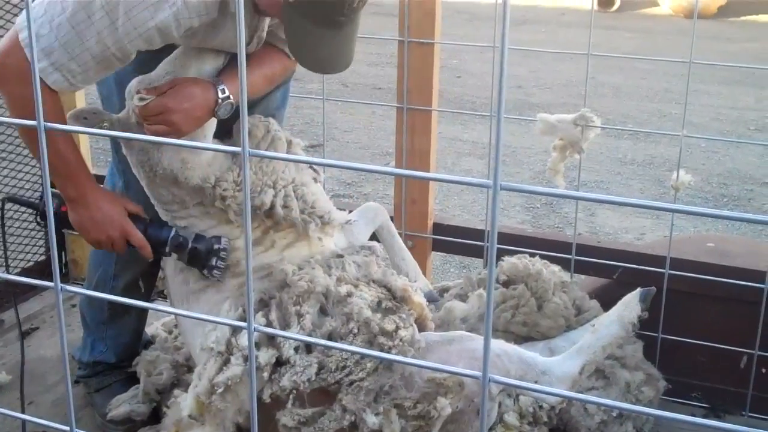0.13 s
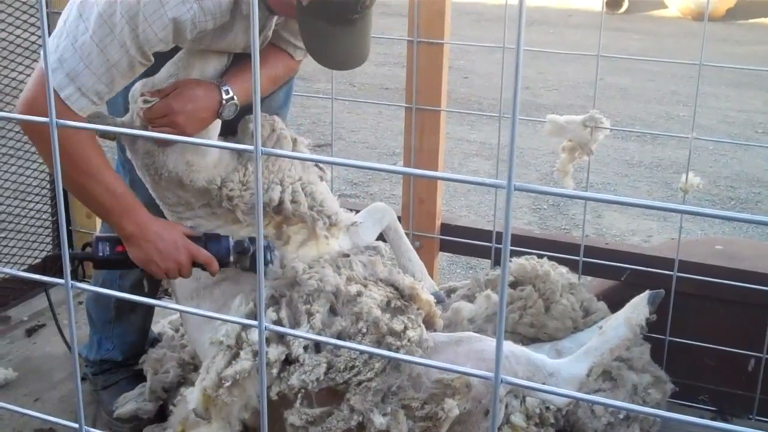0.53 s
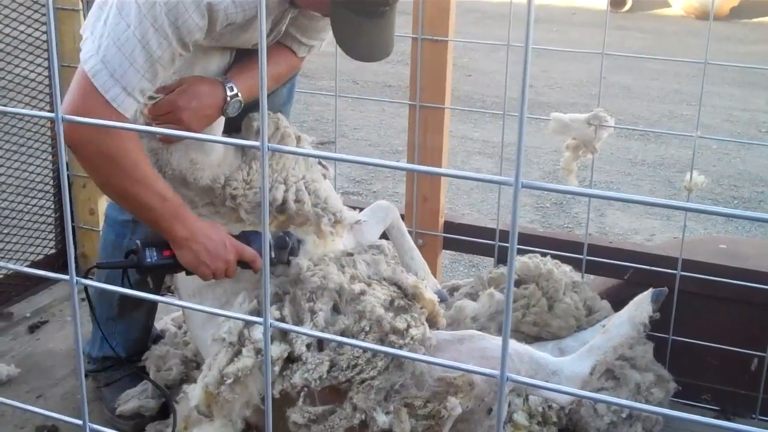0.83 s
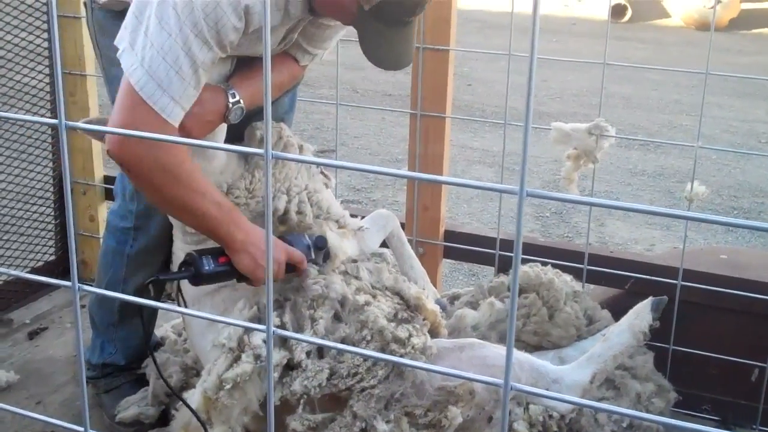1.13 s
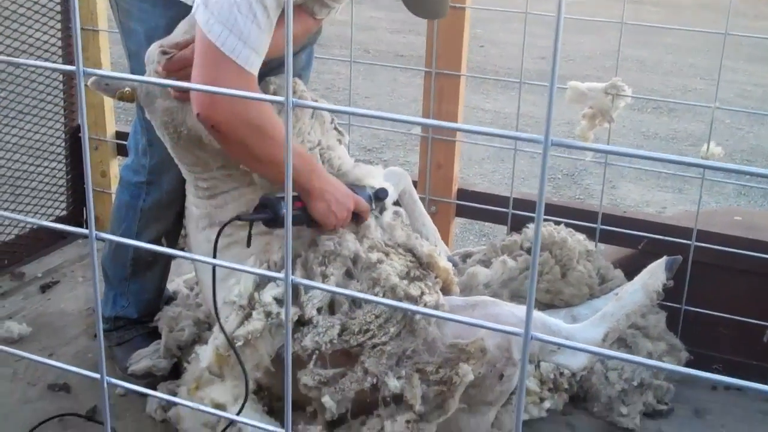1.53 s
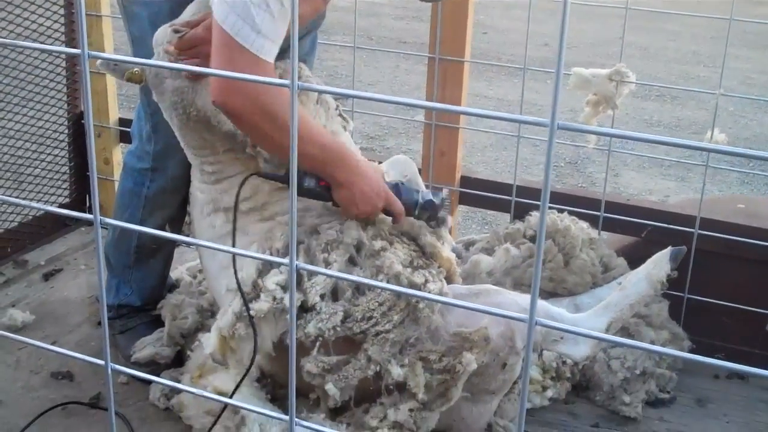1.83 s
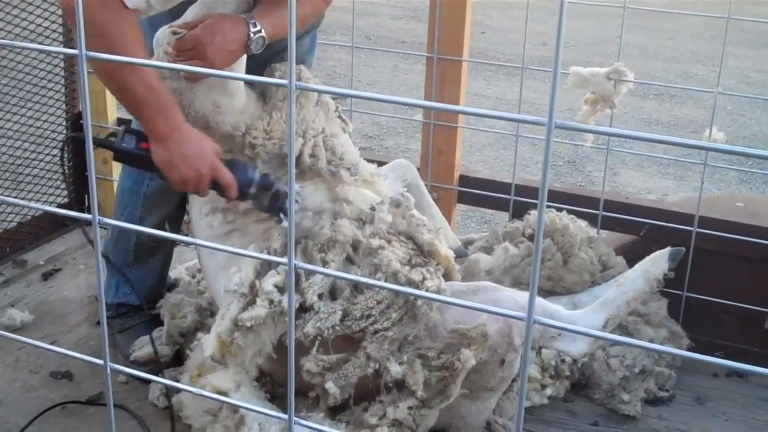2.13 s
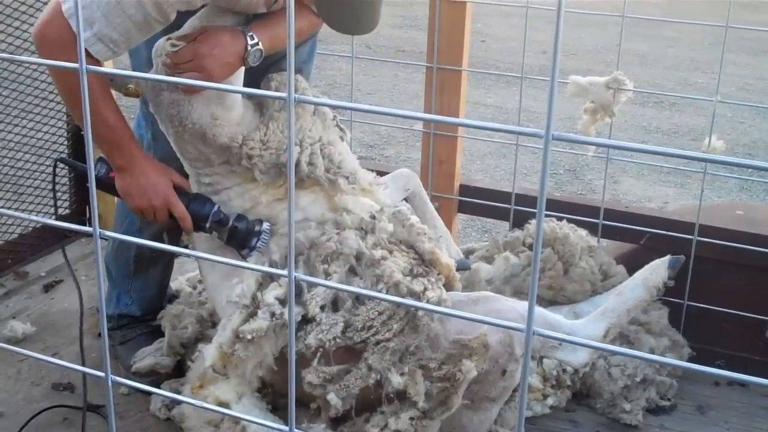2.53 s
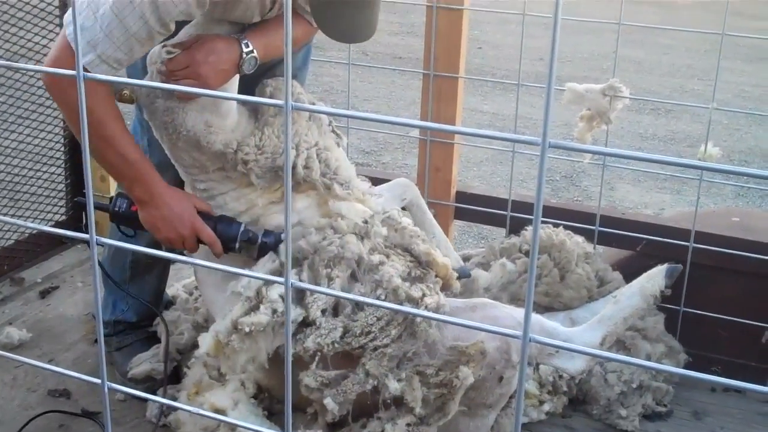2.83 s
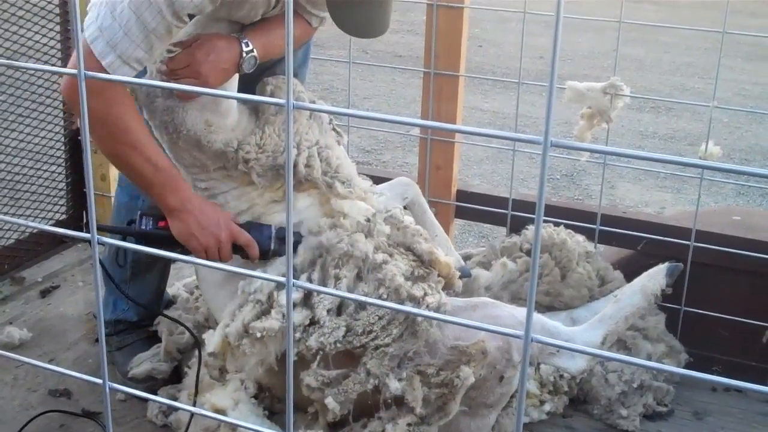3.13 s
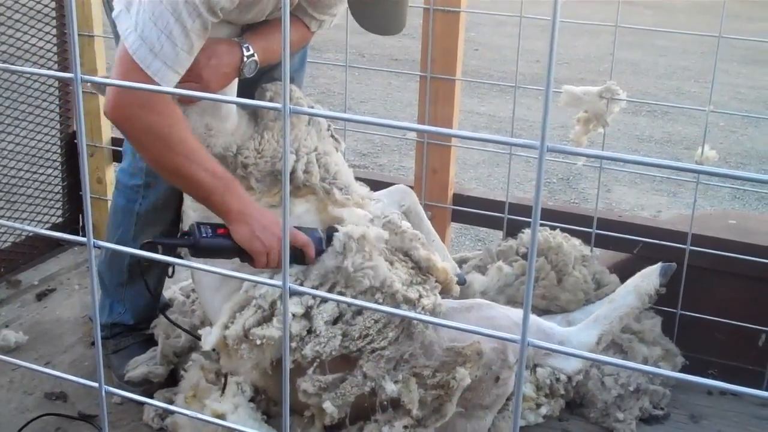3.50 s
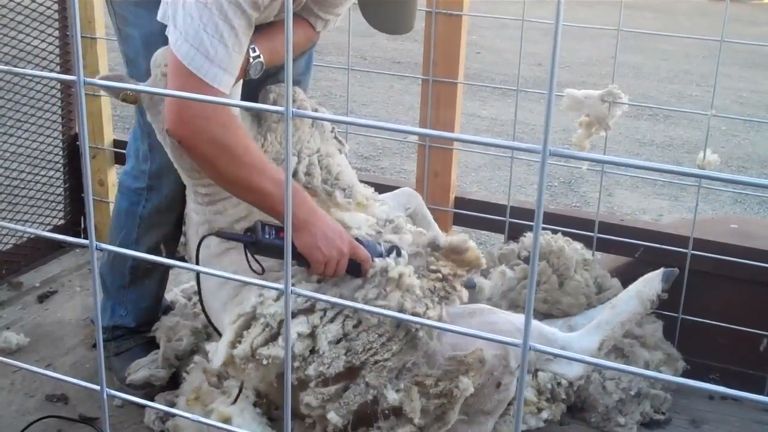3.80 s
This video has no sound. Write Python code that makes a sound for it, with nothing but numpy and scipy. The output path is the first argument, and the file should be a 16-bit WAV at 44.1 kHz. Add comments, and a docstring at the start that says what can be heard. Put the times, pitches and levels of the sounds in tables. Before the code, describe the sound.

A fast, rattling clipper motor whines and scrapes continuously while shearing a sheep, its tone shifting as the tool turns. Close stereo microphone outdoors, slightly left, with occasional blade snaps and light low wind.

```python
"""Electric sheep shears in an outdoor pen

Electric shears work on a sheep a few steps away. A fast motor drives a 7-tooth pinion and a crank: sines at the
turning rate and at the tooth rate. The cutter, shaped noise, knocks at each reversal and scrapes across the comb.
The motor slows in the wool and the hand turns the tool so that its colour shifts; the blades snap now and then.
Light wind, low noise, rumbles in two microphone ports, mostly the left."""
import sys
import numpy as np
from scipy import signal
from scipy.fft import rfft, irfft, next_fast_len
from scipy.io import wavfile
from scipy.ndimage import uniform_filter1d, map_coordinates

SR = 44100
rng = np.random.default_rng(int(sys.argv[2]) if len(sys.argv) > 2 else 0)


def linear_from_db(decibels):
    """Turn decibels (scalar or array-like) into linear amplitude factors; 0 gives 1."""
    return 10 ** (np.asarray(decibels, float) / 20)


def generate_wav(signal):
    """Clip the signal to [-1, 1] and save it as 16-bit WAV at the path in sys.argv[1]."""
    frames = np.transpose(np.atleast_2d(signal))
    scaled = np.clip(frames, -1, 1) * 32767
    pcm = np.round(scaled).astype(np.int16)
    wavfile.write(sys.argv[1], SR, pcm)


N = 174636  # samples

# Radiation as the tool turns. Each row: time in seconds, level of the gear mesh tone in dB, level of its octave
# in dB, then scrape level in dB around each band of facing(), where only its change about the mean counts.
FACING_LEVELS = [(0.0, -25, -32, -47, -35, -27.5, -21.5, -23),
                 (0.3, -19, -53, -50.5, -26.5, -22.5, -22.5, -19.5),
                 (0.52, -28, -25, -47.5, -32.5, -25, -22, -22),
                 (0.75, -31, -44, -46.5, -34.5, -23.5, -23.5, -20),
                 (1.0, -23.5, -26, -44, -34, -22.5, -19.5, -23.5),
                 (1.27, -24, -28, -44, -34.5, -24, -19, -22.5),
                 (1.5, -30.5, -39, -42.5, -31, -22.5, -21.5, -20.5),
                 (1.8, -30.5, -29, -40, -35, -18.5, -21, -20.5),
                 (2.08, -19, -32.5, -47.5, -29.5, -24, -18.5, -21.5),
                 (2.3, -22, -29, -52, -29.5, -20.5, -23.5, -22.5),
                 (2.5, -27.5, -56, -48.5, -37.5, -29, -25, -24),
                 (2.75, -26.5, -30, -49.5, -33, -24, -21.5, -19.5),
                 (3.0, -20, -42, -45, -31, -20.5, -24.5, -20),
                 (3.2, -22.5, -21, -44.5, -31.5, -21.5, -20.5, -20.5),
                 (3.5, -21, -32, -44, -35, -23, -18, -22), (3.75, -29.5, -29, -46.5, -36, -27, -18.5, -27),
                 (3.96, -20, -31, -56, -36.5, -27.5, -19.5, -23.5)]


def unit(x):
    """Normalisation: divides by the root mean square, so that the rms is 1."""
    return x / np.sqrt(np.mean(x ** 2) + 1e-20)


def along(points, hz):
    """Logarithmic pitch scale: interpolates (Hz, value) points on a log frequency axis."""
    f, v = np.transpose(points)
    return np.interp(np.log(hz + 1), np.log(f + 1), v)


def curves(rows, t=None):
    """Piecewise-linear motion: one value per moment for each column after the time."""
    s, *columns = np.transpose(rows)
    moments = np.arange(N) / SR if t is None else t
    return np.array([np.interp(moments, s, column) for column in columns])


def wobble(rate):
    """Band-limited randomness: a smooth spline through random knots, rate of them a second."""
    knots = rng.standard_normal(N // 8)
    return map_coordinates(knots, [np.arange(N) * rate / SR])


def filtered(x, response):
    """Linear filtering: multiplies the spectrum by a response of frequency."""
    m = next_fast_len(N + SR // 2)
    spectrum = rfft(x, m) * response(np.fft.rfftfreq(m, 1 / SR))
    return irfft(spectrum, m)[..., :N]


def spread(pair):
    """Interchannel coherence: mid and side weights cos and sin of a give left and right a correlation cos 2a."""
    # Each row: frequency in Hz, left-right correlation (0-1).
    likeness = [(600, .99), (2900, 0.93), (6200, 0.76), (9500, 1)]

    def angle(hz):
        return np.arccos(np.clip(along(likeness, hz), -1, 1)) / 2

    mid, side = filtered(pair, lambda hz: np.array([np.cos(angle(hz)), np.sin(angle(hz))]))
    return np.array([mid + side, mid - side])


def turns():
    """Rotational kinematics: motor turns so far are the running integral of its speed."""
    # Motor speed under load. Each row: time in seconds, speed in turns a second.
    motor_speed = [(0.0, 358.2), (0.2, 357.9), (0.45, 355.4), (0.65, 353.9), (0.85, 350.5), (1.1, 349.7),
                   (1.35, 350.4), (1.55, 350.3), (1.75, 354.2), (1.95, 358.3), (2.15, 359.6), (2.45, 360.4),
                   (2.7, 359.2), (2.95, 355.3), (3.2, 351.7), (3.45, 348.4), (3.7, 348.7), (3.96, 354.1)]
    return np.cumsum(curves(motor_speed)[0]) / SR


def stroke():
    """Crank motion locked to the motor: strokes so far, and the repeating swell of each stroke in dB."""
    # One stroke of the cutter. Each row: share of the stroke (0-1), swell in dB.
    swell_shape = [(0, -9), (.05, 2), (.2, 2), (.35, 1), (.56, 1.5), (.85, -9), (1, -9)]
    strokes_per_turn, first_reversal = .193, .95  # the latter in strokes from the start
    strokes = turns() * strokes_per_turn - first_reversal + 2  # + 2 keeps the count positive
    return strokes, np.interp(strokes % 1, *np.transpose(swell_shape))


def cutter():
    """Friction and impact: noise swells with each stroke over a steady whirr; decaying knocks mark reversals."""
    # Each row: frequency in Hz, share (0-1) of the power that runs steadily as whirr.
    whirr_share = [(1000, .88), (2200, .6), (3200, .33), (4800, .1), (10000, .7)]
    # Each row: frequency in Hz, knock level in dB over the scrape.
    knock_colour = [(250, -7.5), (1500, -6.5), (3000, -9), (10000, -8)]
    # Spectrum of the whole cutter. Each row: frequency in Hz, relative level in dB per Hz.
    scrape_colour = [(150, -42), (560, -32), (696, -16.5), (1040, -24), (1570, -10.5), (1860, -14.5),
                     (2130, -2), (2550, -7), (3050, 0), (4000, -6.5), (5090, -6.5), (6390, -16),
                     (10300, -28.5), (12500, -34.5), (14500, -50)]
    stroke_scatter_db, grit_db = 1, 1.5
    knock_t60_s, knock_scatter_db = .009, 1

    strokes, shape_db = stroke()
    nth = strokes.astype(int)
    luck = rng.standard_normal((nth[-1] + 1, 2))  # for each stroke: swell, knock
    swell_db = shape_db + stroke_scatter_db * luck[nth, 0]
    grit = grit_db * np.tanh(wobble(1200))
    scrape = unit(linear_from_db(swell_db + grit) * rng.standard_normal((2, N)))

    def share(hz):
        return np.clip(along(whirr_share, hz), 0, 1)

    rub = filtered(scrape, lambda hz: np.sqrt(1 - share(hz)))
    whirr = filtered(rng.standard_normal((2, N)), lambda hz: np.sqrt(share(hz)))

    reversals = np.diff(nth, prepend=nth[0])
    blows = reversals * linear_from_db(knock_scatter_db * luck[nth, 1])
    t = np.arange(2048) / SR
    knocks = 0
    for way in range(2):  # each direction keeps one ring of its own
        ring = rng.standard_normal((2, len(t))) * linear_from_db(-60 * t / knock_t60_s)
        this_way = blows * (nth % 2 == way)
        knocks = knocks + signal.fftconvolve(this_way[None], ring, axes=1)[:, :N]
    knocks = filtered(unit(knocks), lambda hz: linear_from_db(along(knock_colour, hz)))
    return spread(filtered(rub + whirr + knocks, lambda hz: linear_from_db(along(scrape_colour, hz))))


def facing(x):
    """Directivity: as the tool twists, band levels change, ridges glide and narrow patches drift."""
    # Middles of the scrape bands, in Hz.
    band_hz = [750, 1500, 2150, 3100, 5200]
    # Bright ridges that glide through the scrape as the tool swings. Each row: middle in seconds, length in
    # seconds, centre at its start in Hz, centre at its end in Hz, height in dB.
    ridges = [(0.447, .3, 2950, 2940, 7), (.64, 0.22, 4150, 4500, 5.5), (1.433, 0.16, 3820, 3900, 5.5),
              (1.66, .2, 4000, 4200, 7), (2.084, 0.2, 3440, 3830, 9)]
    ridge_width_hz, twist_db = 220, 1.9  # half-width to 1/e of the height in dB; rms of the patches
    cutter_db = -17.5  # rms level

    hz, t, z = signal.stft(x, SR, nperseg=512)
    levels = curves(FACING_LEVELS, t)[2:]
    changes = levels - levels.mean(axis=1, keepdims=True)
    low_end, high_end = (band_hz[0] / 2, 0), (band_hz[-1] * 4, 0)
    change_db = np.array([along([low_end, *zip(band_hz, now), high_end], hz) for now in changes.T]).T
    for s, length, from_hz, to_hz, db in ridges:
        part = (t - s) / length  # -.5 at the start, .5 at the end
        centre = from_hz + (to_hz - from_hz) * (part + .5)
        offset = (hz[:, None] - centre) / ridge_width_hz
        change_db += db * np.exp(-(2 * part) ** 4 - offset ** 2)
    patches = uniform_filter1d(rng.standard_normal(change_db.shape), size=2, axis=0)
    patches = uniform_filter1d(patches, size=40, axis=1)
    out = signal.istft(z * linear_from_db(change_db + twist_db * unit(patches)), SR, nperseg=512)[1][:, :N]
    return linear_from_db(cutter_db) * unit(out)


def gears():
    """Gear meshing: tones at tooth rate and octave swell and sway in phase with the crank load, over motor hum."""
    # Each row: motor order (cycles a turn), level in dB.
    hum_orders = [(1, -57.5)]
    teeth, hum_waver_db = 7, 1.2
    swell_shares = .8, 1.6  # of the stroke's swell in dB: mesh tone, octave
    sway_rad, sway_lag, sway_drift = .75, .12, .3  # phase swing; its delay and random drift in strokes

    turn = turns()
    strokes, swell_db = stroke()
    out = 0
    for order, db in hum_orders:
        level = linear_from_db(db + hum_waver_db * wobble(4.9))
        out = out + level * np.sqrt(2) * np.sin(2 * np.pi * order * turn)
    for k, level_db in enumerate(curves(FACING_LEVELS)[:2]):
        sway = sway_rad * np.sin(2 * np.pi * (strokes - sway_lag + sway_drift * wobble(1.93)))
        jitter = 0.47 * (k + 1) * wobble(25.45)
        phase = 2 * np.pi * (k + 1) * teeth * turn + sway + jitter
        level = linear_from_db(level_db + swell_shares[k] * swell_db + 2.53 * wobble(20))
        out = out + level * np.sqrt(2) * np.sin(phase)
    return out


def wind():
    """Turbulent pressure: low noise, unrelated between the ports, rises and falls with the gusts."""
    # Each row: time in seconds, gust level in dB ahead of the port offsets and lumps.
    gust_levels = [(0, -65.5), (2.3, -70), (2.6, -60), (2.96, -53.5), (3.2, -55.5), (3.5, -67), (3.7, -43),
                   (3.96, -57)]
    # Each row: frequency in Hz, relative level in dB per Hz.
    rumble_colour = [(20, 2), (60, 1.5), (150, -13), (400, -43), (900, -120)]
    left_db, right_db, lumps_db = 4, -7, 5  # port offsets; size of the random lumps

    noise = rng.standard_normal((2, N))
    rumble = unit(filtered(noise, lambda hz: linear_from_db(along(rumble_colour, hz))))
    lumps = lumps_db * np.array([wobble(14), wobble(17)])
    return rumble * linear_from_db(curves(gust_levels) + lumps + [[left_db], [right_db]])


def snaps():
    """Impulsive contact: each sharp snap of the blades is a short sine burst under a raised-cosine envelope."""
    # Each row: middle in seconds, peak level in dB ahead of the ports.
    snap_times = [(.355, -9), (1.7065, -6), (1.834, -6), (2.1157, -4), (3.58, -5)]
    snap_hz, snap_s = 3000, .0018

    out = np.zeros(N + SR)
    t = np.arange(round(snap_s * SR)) / SR
    burst = np.sin(np.pi * t / snap_s) ** 2 * np.sin(2 * np.pi * snap_hz * t)
    for s, db in snap_times:
        start = round((s - snap_s / 2) * SR)
        out[start:start + len(t)] += linear_from_db(db) * burst
    return out[:N]


def scene():
    """Interaural cues: level and time differences set the tool to the left; wind is added at the ports."""
    # Each row: frequency in Hz, left over right in dB.
    port_lean = [(300, 0.5), (2000, 1.4), (5500, 2.5), (10000, 0.5), (13000, -1.5)]
    # The tool travels from the left towards the middle, twice.
    # Each row: time in seconds, lead of left over right in samples.
    port_lead = [(0, 0.97), (1.1, 0.8), (1.45, 0.53), (1.9, 0.14), (2.5, 0.96), (3.2, 0.76), (3.96, 0.49)]

    tool = facing(cutter()) + gears() + snaps()
    hz, t, z = signal.stft(tool, SR, nperseg=512)
    hz = hz[:, None]
    half = np.array([[[.5]], [[-.5]]])  # each port takes half the difference
    gain = linear_from_db(half * along(port_lean, hz))
    shift = np.exp(2j * np.pi * hz * half * curves(port_lead, t) / SR)
    return signal.istft(z * gain * shift, SR, nperseg=512)[1][:, :N] + wind()


def roll_off(x):
    """The treble ends steeply here."""
    return signal.sosfilt(signal.butter(12, 14040, fs=SR, output="sos"), x)


def record(dry):
    """Superposition is complete: the two port signals are already the finished mix."""
    return roll_off(dry)


dry = scene()
out = record(dry)
generate_wav(out)
```